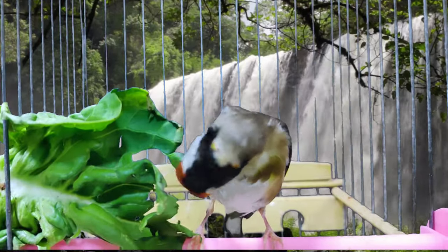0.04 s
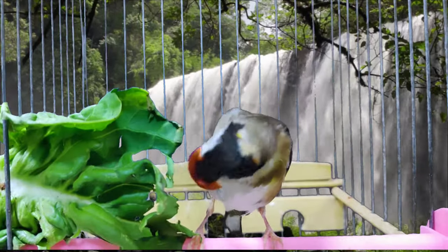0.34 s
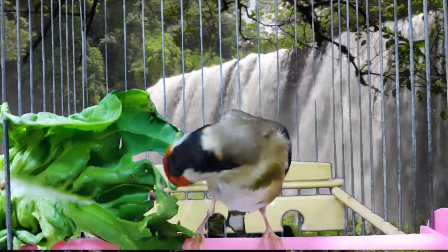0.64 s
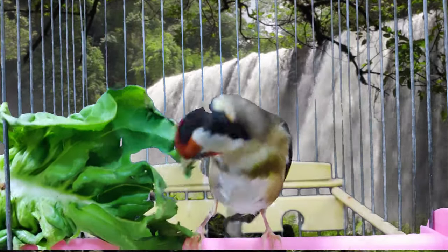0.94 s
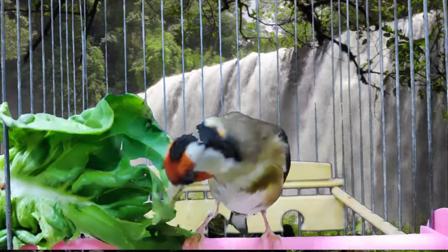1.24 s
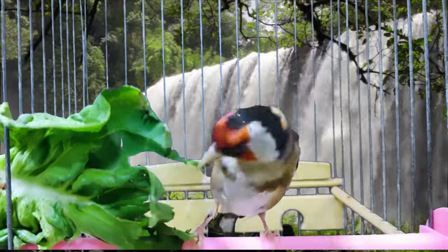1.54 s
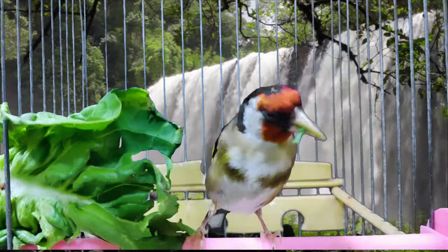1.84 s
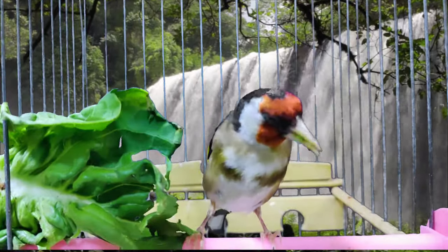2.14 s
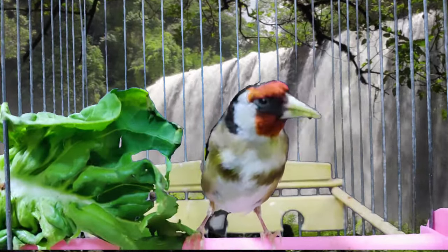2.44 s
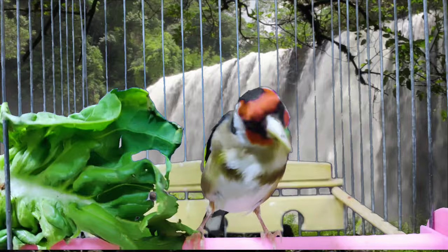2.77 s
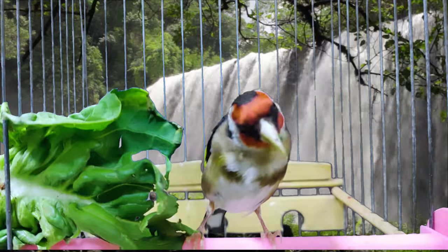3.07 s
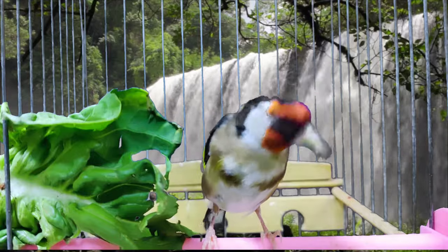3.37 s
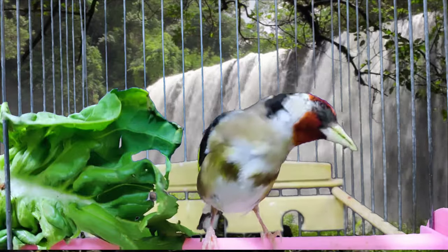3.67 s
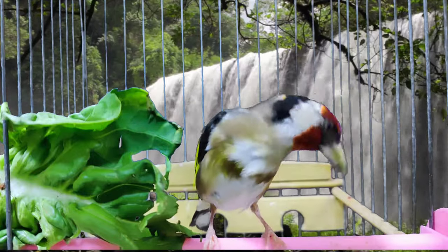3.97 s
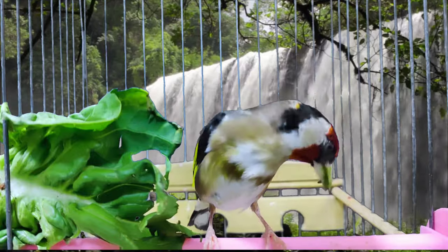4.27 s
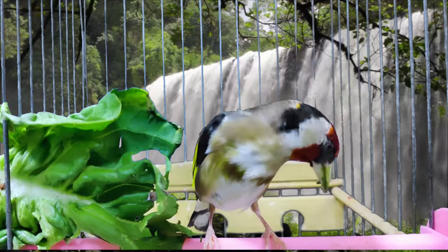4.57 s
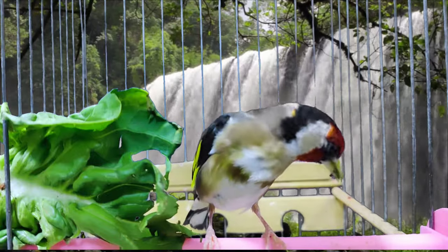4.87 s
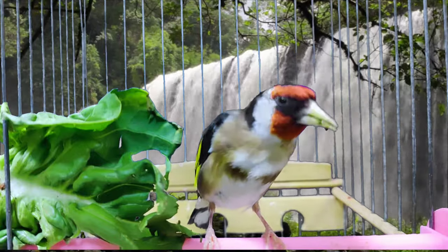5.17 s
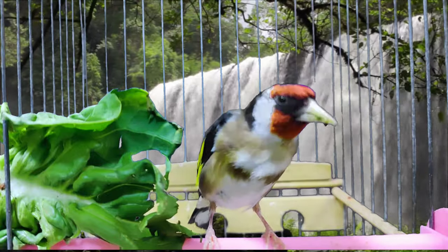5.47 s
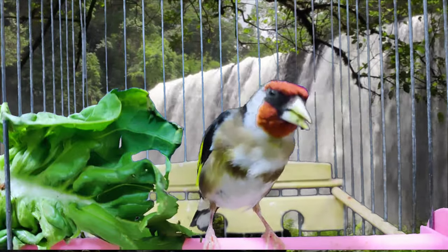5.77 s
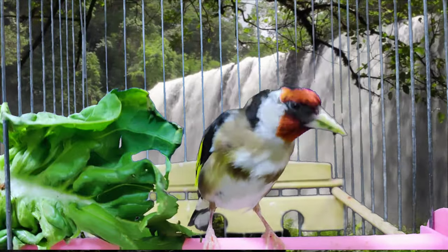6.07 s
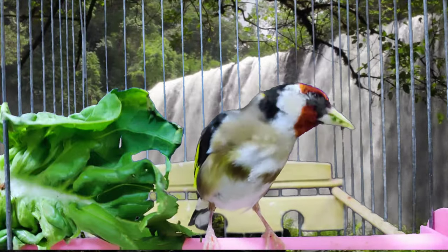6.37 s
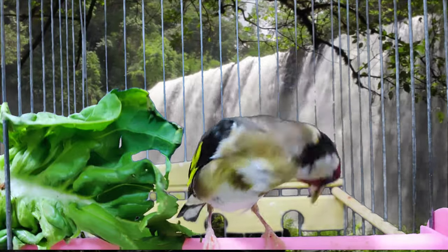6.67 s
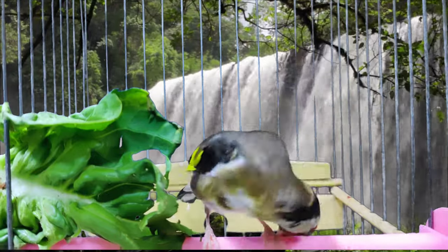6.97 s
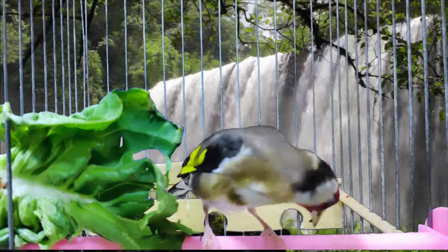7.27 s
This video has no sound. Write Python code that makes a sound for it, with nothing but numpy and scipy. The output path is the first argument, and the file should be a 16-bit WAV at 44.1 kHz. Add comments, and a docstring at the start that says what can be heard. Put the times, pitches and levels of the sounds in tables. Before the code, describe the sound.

Over steady outdoor hiss, a small caged bird sings from start to finish, pouring out quick rising chirps, sharp pips and buzzy falling notes. It is close, with a faint echo from the cage and nearby walls. Light taps and tiny leaf crackles come between the notes. Wind rumbles softly on the microphone, buffets around the middle and builds once more as the last notes end.

```python
"""Outdoor hiss and light wind on the microphone run throughout. From the first moment a goldfinch
twitters close by in a wire cage: quick whistled glides mixed with notes sung with both sides of the
syrinx at once, all reflected by the cage and faintly by the walls around. Between and under the notes,
beak and feet tick and a nibbled leaf crackles. The wind swells after two seconds, buffets hardest
near four, and rises again as the last notes end, just after seven."""
import sys
import numpy as np
from scipy import signal
from scipy.io import wavfile
from scipy.ndimage import map_coordinates

SR = 44100
rng = np.random.default_rng(int(sys.argv[2]) if len(sys.argv) > 2 else 0)


def put_to_file(sound):
    """Save the sound as 16-bit audio at rate SR, in the file named by the first command-line argument."""
    columns = np.atleast_2d(sound).T  # one column per channel
    safe = np.clip(columns, -1, 1)
    whole_steps = np.round(safe * 32767)
    wavfile.write(sys.argv[1], SR, whole_steps.astype(np.int16))


N = 322371
HISS_DB, WIND_DB, SONG_DB, TICK_DB = -25, 4.5, 0.46, 7  # faders, on top of the levels in the tables


def from_db(db):
    """Decibels to gain."""
    return 10 ** (np.asarray(db) / 20)


def rms_one(x):
    """Scale to unit rms."""
    return x / np.sqrt(np.mean(x ** 2) + 1e-20)


def at_hz(points, hz):
    """Read a curve on a log-frequency axis."""
    points = np.array(points)
    return np.interp(np.log(np.maximum(hz, 1)), np.log(points[:, 0]), points[:, 1])


def add(track, s, sound):
    """Mix a sound into a track from time s on."""
    at = round(s * SR)
    first, last = max(at, 0), min(at + sound.shape[-1], N)
    track[..., first:last] += sound[..., first - at:last - at]


def bandpass(x, low_hz, high_hz, order):
    """Keep one band, with gentle slopes."""
    band = signal.butter(order, [low_hz, min(high_hz, SR / 2 - 1)], "band", fs=SR, output="sos")
    return signal.sosfilt(band, x)


def drift(rate_hz, size):
    """Smooth random modulation with a spread of about 1."""
    pole = np.exp(-2 * np.pi * rate_hz / SR)
    run_in = SR // 20
    smooth = signal.lfilter([1], [1, -2 * pole, pole * pole], rng.standard_normal(size + run_in))
    return rms_one(smooth)[run_in:]


def banded_noise(colour, likeness, flicker_db, flicker_hz, low_hz, count, calm_hz=4500):
    """Half-octave bands of stereo noise, each flickering on its own, the treble less; rms 1."""
    out, edges = 0, low_hz * np.sqrt(2) ** np.arange(count + 1)
    white = rng.standard_normal((2, 2, N))
    for k, (low, high) in enumerate(zip(edges, edges[1:])):
        mid, side = bandpass(white[k % 2], low, high, order=2)
        hz = np.sqrt(low * high)
        alike = np.clip(at_hz(likeness, hz), -1, 1)
        stereo = np.sqrt(1 + alike) * mid + np.sqrt(1 - alike) * side * [[1], [-1]]
        flicker = flicker_db / np.hypot(1, hz / calm_hz) * drift(flicker_hz, N)
        out = out + from_db(at_hz(colour, hz) + flicker) * stereo
    return rms_one(out)


# EQ of the hiss: (frequency [Hz], relative level [dB])
HISS_COLOUR = [(120, 4), (400, -7), (580, 1), (850, -2.5), (1350, 2.5), (1700, -1.5), (2400, -2.5),
               (3300, -5), (4500, -7), (8000, -11), (11000, -15), (15000, -24.5)]
# stereo image of the hiss: (frequency [Hz], left-right correlation [0-1])
HISS_LIKENESS = [(150, 0.93), (600, 0.69), (1400, 0.75), (3000, 0.14), (8000, 0.64), (12000, 0.8)]


def hiss():
    """A steady bed of outdoor air with a fine, fast flicker."""
    air = banded_noise(HISS_COLOUR, HISS_LIKENESS, flicker_db=3.5, flicker_hz=32, low_hz=126.4, count=14)
    return from_db(HISS_DB) * air


# slow level ride of the wind: (time [s], level [dB])
WIND_RIDE = [(0.0, -42), (0.43, -37.5), (0.65, -34), (0.92, -28), (1.26, -36.5), (1.67, -33), (2.08, -25.5),
             (2.52, -25.5), (2.85, -38), (3.32, -33.5), (3.81, -23.5), (4.46, -35.5), (5.8, -27),
             (6.64, -37), (6.88, -33.5), (7.31, -19.5)]
# brief buffets on top of it: (time [s], level [dB], half length [s])
BUFFETS = [(0.552, -25.5, 0.038), (.86, -27.5, 0.015), (1.083, -28, 0.017), (2.097, -21, 0.038),
           (2.656, -20, 0.026), (3.1, -32, 0.018), (3.909, -17, 0.042), (4.088, -21.5, 0.013),
           (5.822, -20.5, 0.031)]
# EQ of the rumble: (frequency [Hz], relative level [dB])
WIND_COLOUR = [(15, -42), (25, -24), (54, 0), (86, -0.5), (188, -11.5), (255, -30), (450, -25), (580, -54),
               (990, -120)]


def wind(brighten=0.55):
    """Lumpy low turbulence, largely unrelated at the two microphone ports; stronger flow is brighter."""
    t = np.arange(N) / SR
    flow = from_db(np.interp(t, *np.transpose(WIND_RIDE)))
    flow += sum(from_db(level_db) * np.exp(-((t - s) / half) ** 2) for s, level_db, half in BUFFETS)
    rumble = banded_noise(WIND_COLOUR, likeness=[(50, 0.18), (300, 0.55)],
                          flicker_db=2.5, flicker_hz=11, low_hz=22.2, count=9)
    flutter = banded_noise(colour=[(150, -1), (450, -28.5)], likeness=[(50, 0), (300, 0.25)],
                           flicker_db=6, flicker_hz=16, low_hz=129, count=4)
    return from_db(WIND_DB) * flow * (rumble + brighten * flow / flow.max() * flutter)


def gesture(length, hz, shape, swell_power=1.42, shimmer_db=1.5):
    """Pitch follows one bent glide through hz while air pressure swells and falls, a little unevenly."""
    first, last, crest = shape
    progress = np.linspace(0, 1, max(int(length * SR), 2))
    glide = np.polyfit([0, .5, 1], [first * hz, hz, last * hz], 2)
    skewed = np.interp(progress, [0, crest, 1], [0, .5, 1])
    swell = np.abs(np.sin(np.pi * skewed)) ** swell_power
    shimmer = from_db(shimmer_db * drift(236, len(progress)))
    return np.polyval(glide, progress), swell * shimmer


def voice_phase(pitch, jitter):
    """Phase of one side of the syrinx, slightly unsteady."""
    return 2 * np.pi * np.cumsum(pitch * (1 + jitter * drift(370, len(pitch)))) / SR


# cue lists of the whistles: (time [s], length [s], middle pitch [Hz], level [dB])
# each with its shape: (first pitch [x middle], last pitch [x middle], loudest point [0-1 of the length])
ARCHES, ARCH_SHAPE = [(0.0, 0.02, 3350, -11), (0.116, 0.028, 3320, -12.5), (0.518, 0.025, 3500, -8.5),
                      (1.119, 0.043, 3320, -8.5), (1.233, 0.024, 3485, -4.5), (1.583, 0.029, 3170, -20.5),
                      (1.641, 0.03, 3350, -14.5), (1.859, 0.038, 3130, -15.5), (1.979, 0.048, 3364, -4.5),
                      (2.947, 0.026, 3280, -17), (3.362, 0.025, 3280, -19.5), (3.416, 0.041, 3110, -18),
                      (3.539, 0.025, 3320, -11), (4.375, 0.021, 3220, -17.5), (4.587, 0.039, 3320, -13.5),
                      (4.907, 0.035, 3780, -9.5), (5.374, 0.028, 3365, -18), (5.838, 0.028, 3190, -18),
                      (5.869, 0.021, 3450, -15), (6.136, 0.037, 3270, -16.5), (6.371, 0.024, 3350, -10.5),
                      (6.47, 0.024, 3330, -8.5), (6.925, 0.027, 3290, -10), (7.026, 0.04, 3248, -12.5),
                      (7.141, 0.045, 3186, -15)], (0.83, 0.902, 0.39)  # rise and sink back
SWEEPS, SWEEP_SHAPE = [(0.199, 0.041, 3213, -5), (0.646, 0.035, 3080, -3.5), (0.677, 0.049, 4005, -2),
                       (0.874, 0.052, 3440, -6.0), (1.111, 0.045, 4900, -10), (1.247, 0.035, 3560, -8),
                       (1.939, 0.016, 3400, -15.0), (1.948, 0.023, 5030, -5), (2.313, 0.042, 3200, -4.5),
                       (2.769, 0.032, 3066, -4), (2.797, 0.052, 3996, -4), (4.204, 0.038, 3185, -5),
                       (5.07, 0.068, 3500, -5.5), (5.214, 0.03, 4910, -4.5), (5.521, 0.027, 3390, -2),
                       (5.61, 0.038, 3610, -10), (5.623, 0.031, 4180, -6)], (0.84, 1.141, 0.33)  # climb evenly to the end
CHIPS, CHIP_SHAPE = [(0.295, 0.03, 2926, -4), (0.391, 0.04, 3287, -4.5), (0.481, 0.037, 2960, -3),
                     (1.087, 0.04, 4980, -9.5), (2.202, 0.031, 3430, -10), (2.205, 0.047, 2890, -4.5),
                     (2.412, 0.027, 2937, -2.5), (2.504, 0.045, 3303, -5), (2.601, 0.027, 2940, -3),
                     (3.049, 0.03, 3210, -13.5), (4.061, 0.045, 2856, -5.5), (4.304, 0.035, 2883, -3.5),
                     (4.518, 0.031, 3370, -20.5), (4.68, 0.034, 2745, -3.5), (4.791, 0.0404, 2864, -4.0),
                     (5.33, 0.031, 3970, -12.5), (6.218, 0.032, 2763, -4), (6.319, 0.042, 2974, -0.5),
                     (6.449, 0.031, 2890, -1.5), (6.664, 0.028, 2765, -2), (6.865, 0.029, 2825, -3.5)], (0.81, 1.007, 0.38)  # scoop up and level off
DIPS, DIP_SHAPE = [(0.484, 0.023, 3740, -16), (1.353, 0.021, 4160, -13), (1.763, 0.015, 3160, -12),
                   (1.914, 0.035, 2970, -18.5), (2.1, 0.023, 4040, -14.5), (5.049, 0.028, 3730, -16.0),
                   (5.308, 0.019, 3330, -17.5)], (1.27, 0.85, 0.5)  # slide down
WHIPS, WHIP_SHAPE = [(0.504, 0.015, 4950, -16.0), (0.536, 0.016, 4570, -9.5), (0.886, 0.028, 3160, -4.5),
                     (1.011, 0.032, 3470, -2.5), (1.159, 0.032, 3085, -3.5), (1.179, 0.043, 3790, -2.5),
                     (1.371, 0.052, 3370, -11), (1.595, 0.047, 3440, -15.5), (1.788, 0.023, 5180, -6.5),
                     (2.068, 0.05, 2680, -4), (2.658, 0.013, 4500, -10.5), (5.103, 0.043, 3480, -7.5),
                     (6.822, 0.027, 3640, -5)], (0.58, 1.04, 0.41)  # shoot up by nearly an octave
PIPS, PIP_SHAPE = [(0.734, 0.023, 3070, -19), (1.857, 0.019, 3930, -12), (2.128, 0.024, 3180, -3),
                   (2.884, 0.032, 3120, -13.0), (3.218, 0.021, 2780, -20.5), (3.757, 0.025, 3060, -16),
                   (3.8, 0.031, 3110, -9), (3.907, 0.031, 3580, -6), (3.92, 0.032, 2610, -2.5),
                   (4.012, 0.026, 3800, -3), (4.179, 0.03, 3160, -7), (4.285, 0.03, 3566, -4.5),
                   (4.391, 0.028, 3814, -1.5), (4.447, 0.0276, 5880, -22.5), (4.585, 0.013, 6280, -15),
                   (4.762, 0.02, 3230, -11.5), (4.933, 0.031, 3280, -6), (4.984, 0.033, 3150, -6.0),
                   (5.197, 0.027, 3800, -2.5), (5.73, 0.021, 2980, -14), (5.79, 0.03, 3140, -6.0),
                   (5.895, 0.032, 3594, -4.5), (6.002, 0.027, 3840, -2), (6.175, 0.024, 3090, -11.5),
                   (6.595, 0.03, 3150, -6.0), (6.7, 0.029, 3604, -5), (6.807, 0.026, 3813, -2.5),
                   (7.05, 0.0207, 5590, -21.5)], (0.72, 1.019, 0.61)  # swell as they climb and stop short


def chirps(jitter=0.0083, overtones_db=(-4.5, -14.5, -30), soft_below_db=-6.5, buzz_db=2.5, rasp_db=-32):
    """Near-sine whistles with weak overtones, each kind on its own glide; soft notes are reedier."""
    out = np.zeros((2, N))
    repertoire = ((CHIPS, CHIP_SHAPE), (PIPS, PIP_SHAPE), (SWEEPS, SWEEP_SHAPE),
                  (ARCHES, ARCH_SHAPE), (WHIPS, WHIP_SHAPE), (DIPS, DIP_SHAPE))
    for notes, shape in repertoire:
        for s, length, hz, level_db in notes:
            pitch, swell = gesture(length, hz, shape)
            phase = voice_phase(pitch, jitter)
            note = from_db(level_db) * swell * np.sin(phase) + rasp(swell, level_db + rasp_db)
            softness = np.clip((soft_below_db - level_db) / 2, -1, 1)
            for harmonic, overtone_db in enumerate(overtones_db, 2):
                note += overtone(harmonic * phase, swell, overtone_db + buzz_db * softness)
            add(out, s, cage(note))
    return out


def rasp(swell, level_db):
    """Bright noise that rides on a note."""
    noise = bandpass(rng.standard_normal(len(swell)), 5000, 14000, order=1)
    return from_db(level_db) * swell * rms_one(noise)


# EQ of the overtones that leave the beak: (frequency [Hz], gain [dB])
OVERTONE_COLOUR = [(4500, -18), (6300, -32), (8000, -37.5), (9300, -42), (9800, -20), (10100, -36),
                   (10500, -26.5), (11000, -22), (11300, -36), (13200, -25), (15000, -31)]


def overtone(phase, swell, level_db, flutter_db=5):
    """A weak, fluttering partial, coloured by throat and beak."""
    hz = np.gradient(phase) * SR / (2 * np.pi)
    gain = from_db(at_hz(OVERTONE_COLOUR, hz) + level_db + flutter_db * drift(68, len(hz)))
    return gain * np.sqrt(swell) * np.sin(phase) * (hz < SR / 2)


def diffuse_tail(seconds, t60, onset_s, level_db):
    """Stereo impulse response of many small echoes that build up and die away."""
    t = np.arange(int(seconds * SR)) / SR
    tail = rng.standard_normal((2, len(t))) * from_db(-60 * t / t60) * (1 - np.exp(-t / onset_s))
    return from_db(level_db) * rms_one(tail) / np.sqrt(len(t))


# early reflections from tray, feeder and cage walls: (delay [s], level [dB])
REFLECTIONS = [(.0017, -13.5), (.0036, -15), (.0065, -15.5), (0.0109, -14), (.017, -22)]


def cage(sound, pan_spread_db=0.5, lag_spread_s=0.000011, path_spread=0.12):
    """The bird moves between notes, so each meets the near surfaces and the bars by paths of its own."""
    response = diffuse_tail(1 / 16, t60=0.061, onset_s=0.0056, level_db=-10)
    response[:, 0] = 1  # direct sound
    for delay, level_db in REFLECTIONS:
        # a reflection arrives from the side, a little earlier at one port than at the other
        arrival = delay * np.exp(path_spread * rng.normal()) + rng.uniform(0, .00022, 2)
        response[[0, 1], np.round(arrival * SR).astype(int)] += from_db(level_db)
    left, right = signal.fftconvolve(sound[None], response, axes=1)
    lag = rng.normal() * lag_spread_s * SR
    right = map_coordinates(right, [np.arange(len(right)) + lag])
    pan_db = rng.normal() * pan_spread_db
    return np.array([left, right]) * from_db([[pan_db], [-pan_db]])


def yard(sound):
    """A faint reverb from the walls around."""
    tail = diffuse_tail(0.5, t60=0.32, onset_s=0.0068, level_db=-22.5)
    return signal.fftconvolve(sound, tail, axes=1)[:, :N]


def falling_shape(length, fall_octaves_per_s=13, settle_octaves_per_s=1.56, crest=0.53):
    """A fast drop in the first half, settling in the second; a longer note starts higher."""
    return 2 ** (fall_octaves_per_s * length / 2), 2 ** (-settle_octaves_per_s * length / 2), crest


# cue lists of the two-voiced notes, falling or nearly level: (time [s], length [s], lower pitch [Hz],
# lower level [dB], upper pitch [Hz], upper level [dB], overtone trim [dB])
FALLING_DUETS = [(0.029, 0.045, 5360, -14, 6580, -10, -1), (0.135, 0.053, 4730, -7, 5740, -7, -4),
                 (0.594, 0.056, 3910, -5, 5240, -4.5, -5), (0.766, 0.034, 5960, -13, 6830, -14, -13),
                 (0.819, 0.044, 4880, -11.5, 5800, -9.5, 6), (0.946, 0.039, 4746, -8.5, 6010, -12, 2),
                 (1.46, 0.053, 4200, -5, 5460, -7, 0.5), (1.66, 0.064, 4660, -8.5, 5800, -12.5, -2),
                 (2.899, 0.029, 5930, -14, 6720, -13, -16), (2.952, 0.033, 4780, -10, 5800, -9.5, 4.5),
                 (3.403, 0.031, 5530, -8.5, 6670, -5, 6), (3.494, 0.053, 4655, -5.5, 5860, -6, 1),
                 (3.635, 0.057, 4725, -5.5, 5620, -7.5, -8.5), (4.999, 0.026, 5610, -8, 6470, -10.5, 1),
                 (5.404, 0.029, 5420, -10, 6350, -8, 5), (5.44, 0.065, 4340, -9.5, 5550, -5.5, 4),
                 (5.93, 0.033, 5630, -9, 6520, -15, -4)]
HELD_DUETS, HELD_SHAPE = [(0.053, 0.036, 5880, -3.5, 6780, -11, -5),
                          (0.364, 0.039, 3780, -4.5, 5030, -25, -9),
                          (0.536, 0.05, 5300, -19, 6170, -13, -2), (1.242, 0.036, 5980, -14, 6930, -20, -7),
                          (1.279, 0.031, 5210, -24, 6200, -23, -6), (1.601, 0.053, 5380, -17, 6540, -22, 4),
                          (1.74, 0.039, 4700, -10.5, 5910, -21, -1),
                          (2.659, 0.046, 5350, -19, 6170, -13, 1)], (0.94, 0.95, 0.36)


def duets(jitter=0.0085, rasp_db=-21):
    """Both sides of the syrinx sound at once and modulate each other, adding a sum tone and sideband."""
    out = np.zeros((2, N))
    notes = [(row, falling_shape(row[1])) for row in FALLING_DUETS]
    notes += [(row, HELD_SHAPE) for row in HELD_DUETS]
    for (s, length, low_hz, low_db, high_hz, high_db, trim_db), shape in notes:
        pitch, swell = gesture(length, low_hz, shape)
        low, high = voice_phase(pitch, jitter), voice_phase(pitch + high_hz - low_hz, jitter)
        voices = from_db(low_db) * np.sin(low) + from_db(high_db) * np.sin(high)
        note = swell * voices + rasp(swell, low_db + rasp_db)
        # harmonics, sum tone and sideband: (phase [rad], relative level [dB])
        partials = (2 * low, 0), (low + high, -1.5), (2 * high, -7.5), (2 * high - low, 3.5), (3 * low, -7)
        note += sum(overtone(phase, swell, partial_db + trim_db) for phase, partial_db in partials)
        add(out, s, cage(note))
    return out


# cue list of beak and foot taps: (time [s], level [dB], ring pitch [Hz])
TICKS = [(0.081, -19, 480), (.989, -20.5, 564), (1.338, -19, 1330), (1.601, -22.5, 1490),
         (1.92, -17.5, 624), (2.069, -15, 1830), (2.285, -22, 2040), (2.717, -21, 470), (2.719, -20, 1520),
         (4.48, -17.5, 1950), (4.639, -21.5, 1280), (5.206, -19.5, 1970), (5.543, -17.5, 1870),
         (6.085, -24, 3830), (6.741, -17, 1495), (7.099, -21.5, 2710)]


def ticks(ring_t60=0.028, crack_t60=0.012, crack_db=-1.5, crack_width=1.64):
    """Each touch is a short dry crack around the pitch of a quickly damped ring."""
    out, t = np.zeros((2, N)), np.arange(SR // 20) / SR
    for s, level_db, hz in TICKS:
        ring = np.sin(2 * np.pi * hz * t) * from_db(-60 * t / ring_t60)
        noise = bandpass(rng.standard_normal(len(t)), hz / crack_width, hz * crack_width, order=2)
        crack = rms_one(noise) * from_db(crack_db - 60 * t / crack_t60)
        add(out, s, cage(from_db(level_db + TICK_DB) * (ring + crack)))
    return out


def nibbling(per_s=8.8, level_db=-25, t60=0.015):
    """Faint random crackles of the leaf in the beak, each at a pitch of its own."""
    out, t = np.zeros((2, N)), np.arange(SR // 40) / SR
    for when, brightness in rng.random((round(per_s * N / SR), 2)):
        hz = 1100 * 7 ** brightness
        snap = bandpass(rng.standard_normal(len(t)), hz / 2, hz * 2, order=1)
        add(out, when * N / SR, rms_one(snap) * from_db(level_db - 60 * t / t60))
    return out


def scene():
    """The caged bird and its reverb over a bed of hiss and wind."""
    bird = from_db(SONG_DB) * (chirps() + duets()) + ticks() + nibbling()
    return hiss() + wind() + bird + yard(bird)


def record(dry, ceiling=0.95, cutoff_hz=15050):
    """A soft clipper rounds the loudest peaks and a steep low-pass cuts the top."""
    rounded = dry / (1 + (dry / ceiling) ** 12) ** (1 / 12)
    return signal.sosfilt(signal.ellip(10, .1, 70, cutoff_hz, fs=SR, output="sos"), rounded)


dry = scene()
out = record(dry)
put_to_file(out)
```